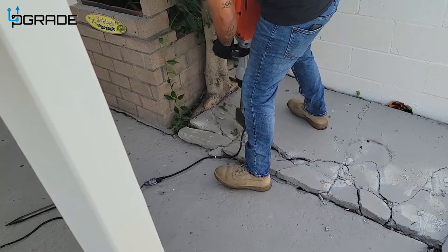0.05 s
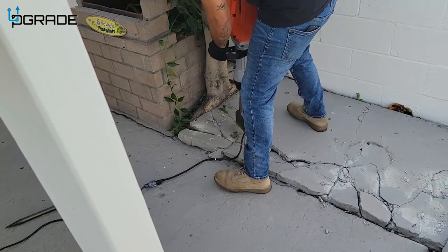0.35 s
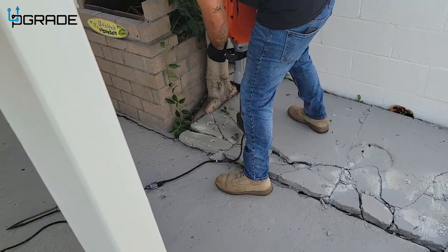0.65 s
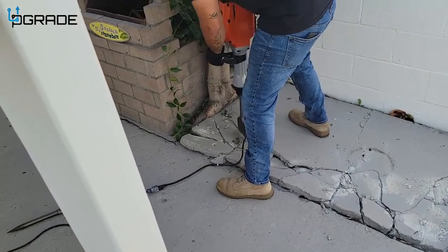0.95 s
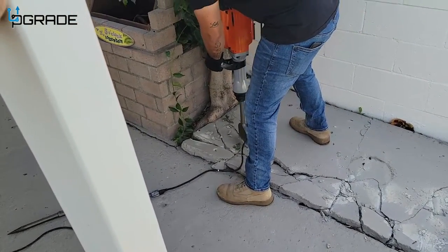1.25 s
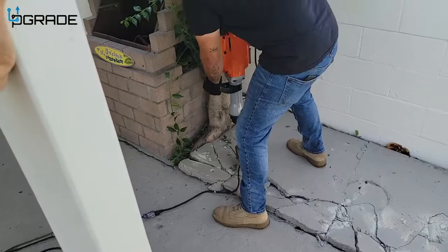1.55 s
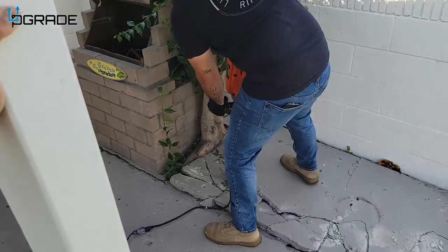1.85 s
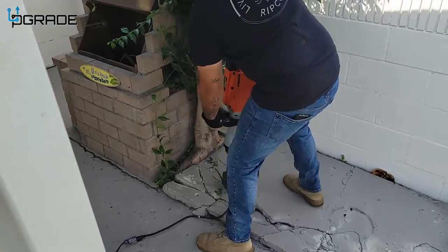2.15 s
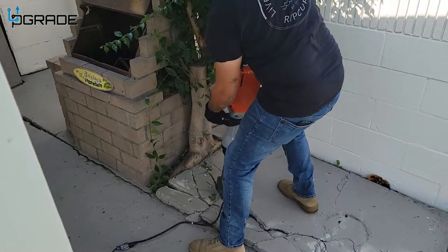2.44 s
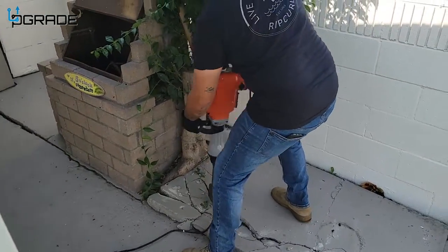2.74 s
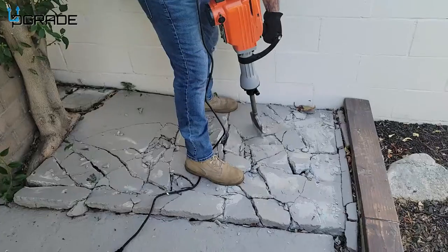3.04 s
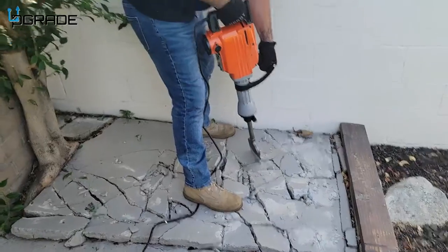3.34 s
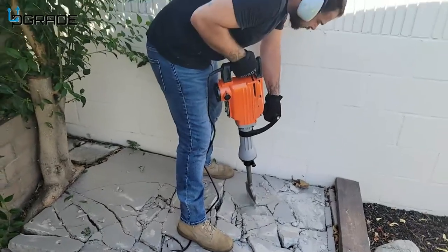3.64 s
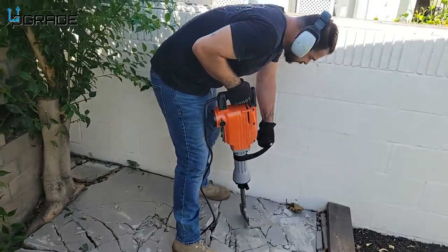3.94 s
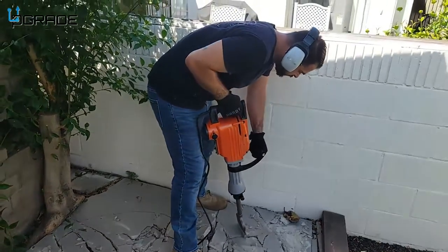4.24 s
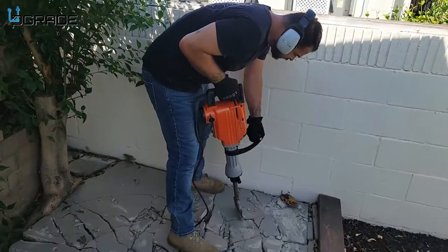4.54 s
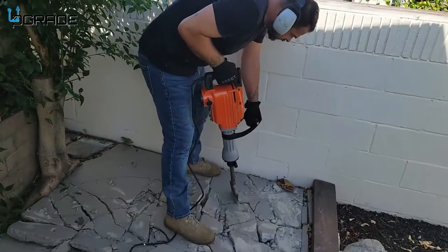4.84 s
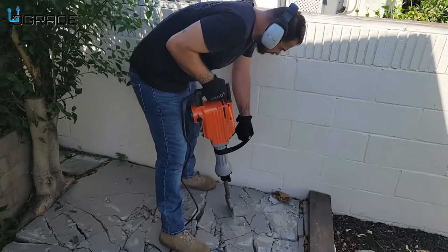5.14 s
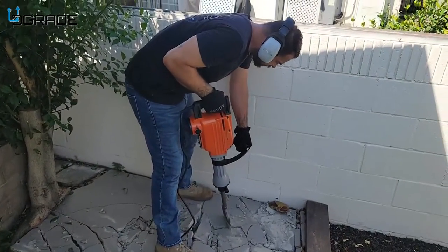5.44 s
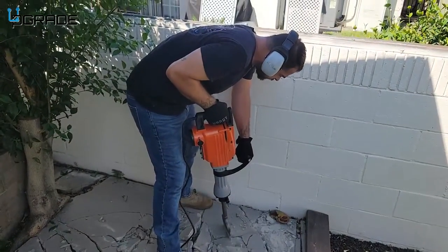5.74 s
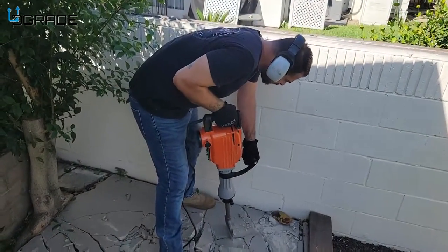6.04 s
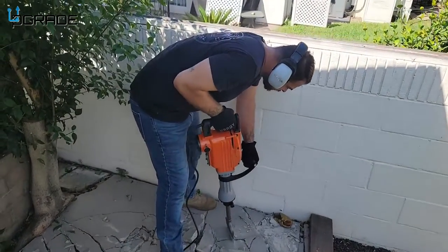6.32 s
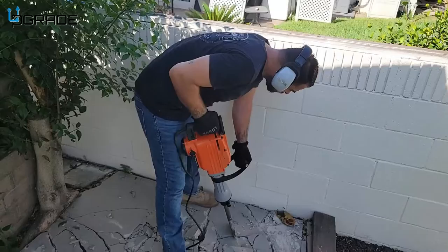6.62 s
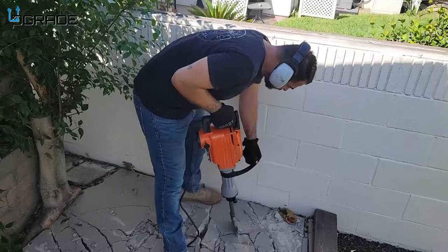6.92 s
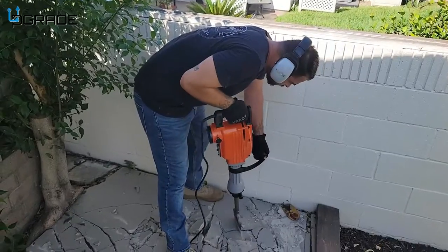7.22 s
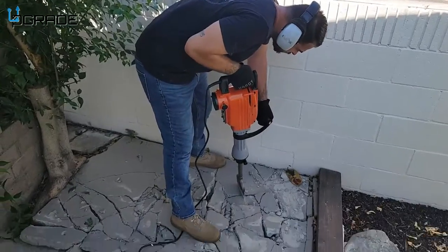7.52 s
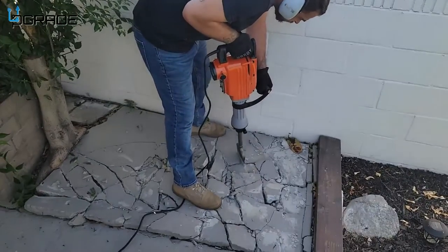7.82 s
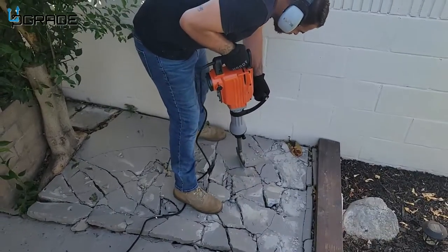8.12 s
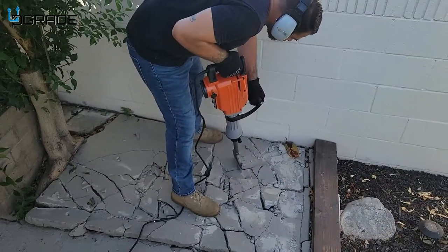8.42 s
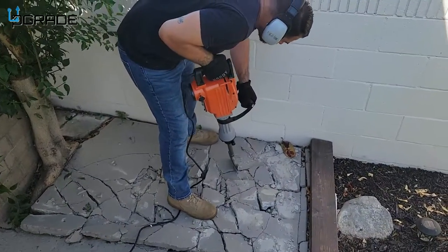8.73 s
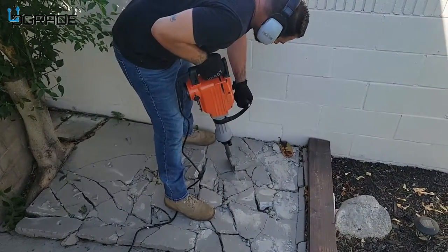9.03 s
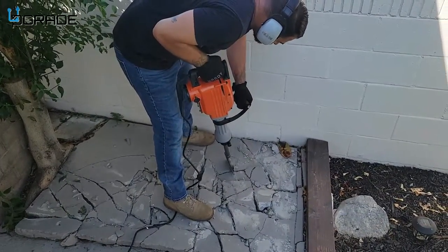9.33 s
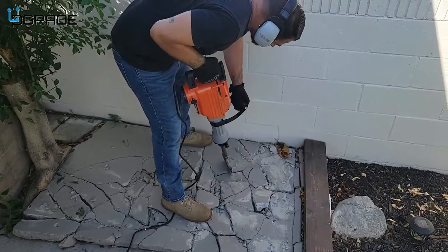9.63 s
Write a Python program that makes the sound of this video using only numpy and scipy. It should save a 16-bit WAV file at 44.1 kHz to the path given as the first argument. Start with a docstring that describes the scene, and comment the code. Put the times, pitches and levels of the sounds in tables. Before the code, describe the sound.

An electric demolition hammer pounds a concrete slab from the start, about 23 hard blows a second, with ringing steel, gritty clatter, low piston thuds and a rushing, whining motor. At about 1.6 seconds it is switched off: the motor fades and the blows slow, dull and weaken, ending near 2.5 seconds. A few faint scrapes of grit follow over a low, distant outdoor rumble. Just before 3 seconds everything cuts to an instant of silence. The hammer comes straight back at full speed, nearer and louder, with heavier thuds. Its chisel bounces slightly unevenly, then settles by about 4.5 seconds. Between 5 and 6 seconds the hollow boom of the casing gives way to more of a drone. The pounding continues steadily, its metallic ring shifting a little, until the end at about 9.8 seconds. The yard's walls add a short reverberation.

```python
"""Hard, ringing blows, 23 a second: an electric demolition hammer breaks a concrete slab in a walled yard. It
works in a corner, is switched off and runs down; then the scene changes abruptly, and it pounds nearer, by a
wall. Each impact excites the damped modes of slab, tool and steel chisel, with a clatter of tiny contacts. The
reversing piston thuds between blows, the motor fan rushes, and the walls return a short reverberation."""
import sys
import numpy as np
from scipy import signal
from scipy.fft import rfft, irfft
from scipy.io import wavfile

SR = 44100
rng = np.random.default_rng(int(sys.argv[2]) if len(sys.argv) > 2 else 0)


def waveform_to_disk(signal):
    """Save audio, clipped to [-1, 1], as 16-bit WAV at the path in sys.argv[1]."""
    frames = np.transpose(np.atleast_2d(signal))
    scaled = np.clip(frames, -1, 1) * 32767
    samples = np.round(scaled).astype(np.int16)
    wavfile.write(sys.argv[1], SR, samples)


N = 435266
TIME = np.arange(N) / SR
BLOW_HZ = 23  # nominal rate, used to normalise levels
CORNER_END_S, WALL_START_S = 2.95, 3.017
PISTON_TURN = .36  # share of a stroke from the blow to the piston's reversal
# the coasting motor loses its fan noise, and its blows stop ringing the chisel
COAST_S, FAN_FALL_DB_PER_S, RING_FALL_DB_PER_S = 1.83, 33, 50
# leaning on the tool damps the boom of the casing and sets the housing droning
LEAN_S, LEAN_TAKES_S, LEAN_BOOM_DB, LEAN_DRONE_DB = 5.17, 0.71, -18.5, 21


def amp(db):
    """Amplitude ratio of a level in decibels."""
    return 10 ** (np.asarray(db) / 20)


def curve(rows, at):
    """Linear interpolation of a table's columns at the given times."""
    s, *columns = np.transpose(rows)
    return [np.interp(at, s, c) for c in columns]


def ramp(at, start_s, takes_s):
    """Linear transition from 0 to 1."""
    return np.clip((at - start_s) / takes_s, 0, 1)


def coasted(at):
    """Seconds for which the motor has been coasting; 0 under power."""
    return np.maximum(at - COAST_S, 0) * (at < CORNER_END_S)


def scatter(times, spread):
    """Independent Gaussian deviations, one a blow."""
    return spread * rng.standard_normal(len(times))


def drift(times, spread, memory=0.85):
    """Correlated deviations: each carries over in part to the next blow."""
    return signal.lfilter([np.sqrt(1 - memory ** 2)], [1, -memory], scatter(times, spread))


def filtered(x, order, hz, kind="low"):
    """Causal, maximally flat filter."""
    return signal.sosfilt(signal.butter(order, hz, kind, fs=SR, output="sos"), x)


def convolve(x, taps):
    """Output of a linear system: x convolved with the impulse response."""
    x, taps = (np.atleast_2d(a).astype(np.float32) for a in (x, taps))
    return signal.oaconvolve(x, taps, axes=-1)[:, :N]


def response(points, size=8192):
    """Minimum-phase impulse response of a spectrum (frequency [Hz], level [dB])."""
    hz, db = np.transpose(points)
    spectrum_db = np.interp(np.log(np.fft.rfftfreq(size, 1 / SR) + 1), np.log(hz), db)
    cepstrum = irfft(np.log(amp(spectrum_db)))
    cepstrum[1:size // 2] *= 2
    cepstrum[size // 2 + 1:] = 0
    return irfft(np.exp(rfft(cepstrum)))[:size // 2]


def decay(t, t60):
    """Exponential damping by 60 dB in t60 seconds."""
    return np.exp(-np.log(1000) * t / t60)


def modes(table, rise_s, size):
    """Modal superposition: a sum of damped sines with a finite rise time."""
    t = TIME[:size]
    ring = sum(amp(db) * np.sin(2 * np.pi * hz * t) * decay(t, t60) for hz, t60, db in table)
    return ring * (1 - np.exp(-t / rise_s))


def per_stroke(ring):
    """Energy normalisation: one such response a stroke gives an rms of 1."""
    return ring * np.sqrt(SR / BLOW_HZ / np.sum(ring ** 2))


def pulses(times, db):
    """Impulse train with the given times and levels."""
    return np.bincount(np.clip(times * SR, 0, N).astype(int), amp(db) * np.ones(len(times)), N + 1)[:N]


def place(times, sounds):
    """Superposition of one sound (a row) at each time."""
    out = np.zeros(N + sounds.shape[1])
    for start, sound in zip(np.clip(times * SR, 0, N).astype(int), sounds):
        out[start:start + len(sound)] += sound
    return out[:N]


# side signal relative to mid: (frequency [Hz], level [dB])
SIDE_SPECTRUM = [(60, -5.5), (150, -2.5), (260, 2), (600, 1.5), (2000, -3), (5000, -.5), (15000, 2.5)]


def stereo(pair):
    """Partial coherence: independent mid and side signals leave the ears most alike in the deep bass."""
    side = convolve(pair[1], response(SIDE_SPECTRUM, size=2048))[0]
    return np.array([pair[0] + side, pair[0] - side]) / np.sqrt(2)


def noise(points):
    """Stationary stereo noise shaped by a spectrum."""
    return stereo(convolve(rng.standard_normal((2, N)), response(points)))


# distant outdoor rumble: (frequency [Hz], level [dB])
RUMBLE_SPECTRUM = [(25, -43), (55, -23), (86, -22), (130, -28.5), (250, -42), (700, -40.5), (2600, -52),
                   (6000, -71), (15000, -73)]


def outdoors():
    """Ambient noise: a steady, distant rumble."""
    return noise(RUMBLE_SPECTRUM)


def yard(x, db, t60=0.28, build_s=0.018, band_hz=(220, 6500), size=26000):
    """Reverberation: block walls and paving add a short diffuse tail, duller than the tool."""
    t = TIME[:size]
    tail = rng.standard_normal((2, size)) * decay(t, t60) * ramp(t, 0, build_s) ** 2
    tail /= np.sqrt(np.sum(tail ** 2) / 2)
    return x + amp(db) * convolve(x, filtered(tail, 1, band_hz, "band"))


# rasps of grit: (time [s], half-width [s], level [dB], centre frequency [Hz])
GRIT_RASPS = [(2.645, 0.0097, -57, 3430), (2.698, 0.014, -51, 1500), (2.802, 0.023, -55, 6000),
              (2.834, .008, -54, 1500), (2.897, .008, -58, 900)]


def scrapes(size=8192):
    """Friction noise: grit rasps as the resting tool is shifted."""
    t, rasps = TIME[:size] - TIME[size // 2], []
    for _, width, db, hz in GRIT_RASPS:
        grit = filtered(rng.standard_normal((2, size)), 1, [hz / 2, hz * 2], "band")
        rasps.append(amp(db) * np.exp(-(t / width) ** 2) * grit / grit.std())
    starts = np.array(GRIT_RASPS)[:, 0] + t[0]
    return np.array([place(starts, np.array(rasps)[:, c]) for c in (0, 1)])


def orders(times, table):
    """Rotational harmonics: tones phase-locked to the crank."""
    running = (TIME > times[0]) & (TIME < times[-1])
    turns = np.interp(TIME, times, np.arange(len(times))) - PISTON_TURN
    return running * sum(amp(db) * np.sqrt(2) * np.sin(-2 * np.pi * order * turns) for order, db in table)


# housing drone: (order [cycles per stroke], level [dB])
DRONE_ORDERS = [(7, -37.5), (9, -42.5), (13, -44.5), (15, -45.5), (17, -41.5), (18, -41.5), (22, -47.5),
                (25, -46.5), (26, -50.5), (28, -49.5), (30, -49.5)]
# gear and commutator whine: (order [cycles per stroke], level [dB])
WHINE_ORDERS = [(92, -68.5), (288, -44.5)]


def motor(times, spot, flutter_db=2.0, drone_db=-21):
    """Machine noise: fan air, modulated by each stroke's load, with drone and whine; all fade on coasting."""
    turns = np.interp(TIME, times, np.arange(len(times)))
    fan = noise(spot["fan"]) * amp(flutter_db * np.sin(2 * np.pi * turns))
    drone = orders(times, DRONE_ORDERS) * amp(drone_db + LEAN_DRONE_DB * ramp(TIME, LEAN_S, LEAN_TAKES_S))
    whine = orders(times, WHINE_ORDERS)
    return (fan + drone + whine) * amp(spot["motor_db"] - FAN_FALL_DB_PER_S * coasted(TIME))


# swells of deep bass in the piston's thuds: (time [s], half-width [s], level relative to the thuds [dB])
BASS_SWELLS = [(1.552, .25, 2), (5.8, 0.24, -18), (8.35, 0.3, -4)]


def swell_bass(thuds, deep_hz=78):
    """Amplitude modulation: the thuds' deep bass swells, first as the unloaded tool shakes at switch-off."""
    swells = sum(amp(db) * np.exp(-((TIME - s) / width) ** 2) for s, width, db in BASS_SWELLS)
    bass = signal.sosfiltfilt(signal.butter(2, deep_hz, fs=SR, output="sos"), thuds)
    return thuds + swells * bass


def piston(times, db, spot, trim_db=-1.0, hollow_hz=(135, 195)):
    """Inertial reaction: the piston reverses between blows and shakes the whole tool."""
    gaps = np.minimum(np.diff(times, append=2 * times[-1] - times[-2]), .06)
    thud = per_stroke(response(spot["piston"], size=4096))
    # all-pass: the hollow housing delays the upper bass, drawing the thuds out into a drone
    thud = thud - 2 * filtered(thud, 1, hollow_hz, "band")
    return convolve(pulses(times + PISTON_TURN * gaps, db + trim_db + scatter(times, 0.099)), thud)


# barrel resonances: (frequency [Hz], 60 dB decay time [s], level [dB])
BARREL_MODES = [(2565, .5, 1), (2597, .6, -2), (2690, 0.51, -6), (3360, .45, 2), (3900, 0.63, -10),
                (4630, 0.51, -5)]


def barrel(times, force_db, bell_db=-45.5, follow=0.28, jitter_s=.0003):
    """Light damping: the metal barrel sustains a faint chord, set off even by weak blows."""
    bell = per_stroke(modes(BARREL_MODES, rise_s=.002, size=32768))
    return convolve(pulses(times + scatter(times, jitter_s), follow * force_db + bell_db), bell)


# casing resonances: (frequency [Hz], 60 dB decay time [s], level [dB])
CASING_MODES = [(267.4, 0.059, 6), (316.5, 0.081, -1.5)]


def casing(times, db, trim_db=-4):
    """Resonance of a hollow body: the tool booms under each blow."""
    boom = per_stroke(modes(CASING_MODES, rise_s=0.0022, size=2048))
    return convolve(pulses(times, db + trim_db + scatter(times, 0.53)), boom)


# tool holder resonances: (frequency [Hz], level [dB])
HOLDER_MODES = [(1720, 1), (2070, 2.5), (2680, 5.5), (3050, 2), (3380, 3), (3800, -17), (4550, 3),
                (5350, 2)]


def clank(times, db, t60=0.11, spread_db=4.5, wander=0.0249, rise_s=0.0018, size=2400):
    """Variable contact: each blow catches the loose holder differently, so its modes vary in pitch and level."""
    t, shape = TIME[:size], (len(times), len(HOLDER_MODES), 1)
    hz, mode_db = np.transpose(HOLDER_MODES)[..., None]
    phase = 2 * np.pi * hz * (1 + wander * rng.standard_normal(shape)) * t
    envelope = per_stroke((1 - np.exp(-t / rise_s)) * decay(t, t60))
    hit = amp(db[:, None, None] + mode_db + spread_db * rng.standard_normal(shape)) / np.sqrt(len(hz))
    sides = [np.sum(hit * np.sin(phase + 2 * np.pi * rng.random(shape)), axis=1) for _ in (0, 1)]
    return np.array([place(times, side * envelope) for side in sides])


# chisel resonances: (frequency [Hz])
CHISEL_FREQUENCIES = [4161, 4936, 6422, 6878, 7930, 9092, 10271, 11020, 12726, 13770, 13950]
# for each of them: (60 dB decay time [s], level [dB], group [0 low, 1 main, 2 high])
CHISEL_MODES = [(0.063, 3.5, 0), (0.097, -4.5, 0), (0.11, -10.5, 1), (0.084, 1, 1), (.09, -12, 1),
                (0.12, -16, 2), (0.1, -11.5, 2), (0.06, -17.5, 2), (0.1, -2.5, 2), (0.081, -11.5, 2),
                (0.11, -10, 2)]
# ring of each group as the chisel shifts in its seat: (time [s], low [dB], main [dB], high [dB])
CORNER_RING_LEVELS = [(0, -35, -40.5, -29), (.45, -37.5, -27.5, -29), (.95, -41, -36, -34.5),
                      (1.2, -37, -32, -29.5), (1.8, -44, -28.5, -33)]
WALL_RING_LEVELS = [(3.05, -38, -29.5, -25), (3.8, -38, -31.5, -25), (4.65, -34, -27, -25.5),
                    (5.45, -37, -31.5, -23), (6.35, -31.5, -25.5, -26.5), (6.72, -27.5, -31.5, -30),
                    (7.05, -37.5, -21.5, -24.5), (7.6, -30.5, -33.5, -27.5), (8.2, -42, -27.5, -25),
                    (8.6, -43, -26, -28), (9.8, -34, -25.5, -27.5)]


def chisel(times, group_db, spot, trim_db=0.5, rise_s=0.0069, uneven_db=3.5, split=0.0025, size=5000):
    """Free vibration of a steel bar: each blow rings its modes anew, each split into a close pair."""
    t = TIME[:size]
    hz, t60, db, group = np.repeat(np.column_stack([CHISEL_FREQUENCIES, CHISEL_MODES]), 2, axis=0).T
    hz = hz * spot["stiffness"] * (1 + split * (-1) ** np.arange(len(hz)))
    rings = np.exp(np.outer(2j * np.pi * hz - np.log(1000) / t60, t)) * (1 - np.exp(-t / rise_s))
    rings *= np.sqrt(SR / BLOW_HZ / np.sum(abs(rings) ** 2, axis=1))[:, None]
    shape = (len(times), len(hz))
    hit = amp(group_db[group.astype(int)].T + db + trim_db) * np.exp(2j * np.pi * rng.random(shape))
    # reflections shift strength and phase at each side
    sides = [hit * amp(uneven_db * rng.standard_normal(shape)) * np.exp(1j * rng.standard_normal(shape))
             for _ in (0, 1)]
    return np.array([place(times, (side @ rings).imag) for side in sides])


# the slab's two modes, shifting as it cracks: (time [s], lower frequency [Hz], upper frequency [Hz])
CORNER_SLAB_MODES = [(0, 850, 1260), (1.0, 850, 1200), (1.6, 980, 1120)]
WALL_SLAB_MODES = [(3.05, 797, 1080), (4.3, 910, 1240), (4.9, 910, 1235), (5.15, 870, 1320),
                   (5.6, 806, 1080), (6.2, 830, 1240), (7.95, 850, 1236), (8.25, 890, 1410),
                   (8.6, 890, 1175), (9.8, 900, 1210)]


def knock(times, db, slab, spot, t60s=(0.023, 0.026), upper_db=-5, wander=0.0046, size=2000):
    """Heavy damping: two dead slab modes, with early reflections from the ground and nearby walls."""
    t = TIME[:size]
    pitches = [hz * (1 + scatter(times, wander)) for hz in curve(slab, times)]
    lower, upper = (np.sin(2 * np.pi * hz[:, None] * t) * decay(t, t60) for hz, t60 in zip(pitches, t60s))
    # the slab radiates little below its modes
    blows = filtered(lower + amp(upper_db) * upper, 2, 520, "high")
    blows = amp(db + spot["knock_db"])[:, None] * np.array([per_stroke(b) for b in blows])
    paths = sum(amp(echo_db) * place(times + ms / 1000, blows) for ms, echo_db in spot["echoes"])
    return paths / np.sqrt(sum(amp(echo_db) ** 2 for _, echo_db in spot["echoes"]))


def clatter(times, db, spot, likeness=0.89, rise_s=0.0013, grit_db=2, size=3000):
    """Impact noise: striker, holder and crumbling concrete make a burst of contacts, much like the last."""
    t = TIME[:size]
    fresh = rng.standard_normal((len(times), 2, size))
    initial = likeness * rng.standard_normal((1, 2, size))
    bursts, _ = signal.lfilter([np.sqrt(1 - likeness ** 2)], [1, -likeness], fresh, axis=0, zi=initial)
    grit = amp(grit_db * np.repeat(rng.standard_normal((len(times), size // 20)), 20, axis=1))
    envelope = amp(db)[:, None] * grit * (1 - np.exp(-t / rise_s)) * np.exp(-t / spot["fade_s"])
    contacts = [place(times, bursts[:, c] * envelope) for c in (0, 1)]
    return stereo(convolve(contacts, response(spot["clatter"])))


def soften(x, dull_hz=5000, fall_db_per_s=14):
    """Contact time limits bandwidth: slower impacts lose their treble as the motor coasts."""
    low = filtered(x, 1, dull_hz)
    return low + (x - low) * amp(-fall_db_per_s * coasted(TIME))


# slowing blows after switch-off: (time [s], force [dB])
COASTING_BLOWS = [(1.595, -2.5), (1.641, -1.5), (1.691, -2), (1.748, -3), (1.811, -4), (1.878, 0.5),
                  (1.957, 0), (2.051, -1.5), (2.175, -3.5), (2.357, -10.5), (2.465, -13)]


def run_down(ring_db=-2.0, rebound_s=0.014, rebound_db=-2, free_gap_s=.1):
    """Inertia drives the last blows, which rebound if there is time: (time [s], force [dB], ring [dB])."""
    times, force_db = np.transpose(COASTING_BLOWS)
    blows = np.transpose([times, force_db, ring_db - RING_FALL_DB_PER_S * coasted(times)])
    rebounds = blows[:-1][np.diff(times) > free_gap_s] + [rebound_s, rebound_db, rebound_db]
    blows = np.vstack([blows, rebounds])
    return blows[np.argsort(blows[:, 0])]


# motor pace under load: (time [s], stroke landing then [count])
CORNER_STROKES = [(.0323, 0), (1.5518, 35)]
WALL_STROKES = [(3.0015, 0), (3.5829, 13), (4.2043, 27), (5.2625, 51), (5.6126, 59), (6.572, 81),
                (7.3612, 99), (7.9708, 113), (8.6639, 129), (9.8362, 156)]
DIG_IN_S, DIG_IN_TAKES_S, BOUNCE_LEFT = 3.9, .55, .13


def strokes(pace, late_s=.0007, soft_db=0.3, glance_db=0.05, choke_db=1.5, jitter_s=.00007):
    """Nearly periodic excitation by the powered striker: (time [s], force [dB], ring [dB])."""
    s, number = np.transpose(pace)
    count = np.arange(int(number[-1]) + 1)
    times = np.interp(count, number, s)
    # period doubling: by the wall the chisel bounces, every second blow late and weak, until it digs in
    bounce = (1 - (1 - BOUNCE_LEFT) * ramp(times, DIG_IN_S, DIG_IN_TAKES_S)) * (times > CORNER_END_S)
    weak = (-1) ** count * bounce
    landings = times + late_s * weak + scatter(times, jitter_s)
    force_db = -soft_db * weak - glance_db * bounce + scatter(times, 0.21)
    return np.transpose([landings, force_db, -choke_db * weak])


# each spot: piston, clatter and fan spectra (frequency [Hz], level [dB]), echoes (delay [ms], level [dB]),
# clatter time constant [s], stiffness [chisel pitch ratio] and the level of each part [dB]
CORNER_SPOT = dict( piston=[(10, -46), (23, -47), (46, 0), (69, 2.5), (92, 5), (115, -5.5), (160, -4.5),
               (200, -14.5), (260, -3), (500, -54), (3000, -86)], clatter=[(120, -48), (300, -10),
               (600, -6.5), (1100, -4), (1900, -7.5), (2400, -10.5), (3000, -10.5), (4400, -10),
               (5700, -11.5), (6700, -8), (8800, -20), (12000, -16), (15500, -25)], fan=[(60, -19.5),
               (300, -22.5), (900, -24), (1300, -27), (1700, -26.5), (3400, -20.5), (5600, -29.5),
               (6600, -23), (9000, -31), (15500, -29.5)], echoes=[(0, -11), (3.9, 10), (6.3, 7)],
               fade_s=0.0096, stiffness=1.003, yard_db=-9.5, knock_db=-39.5, piston_db=-34, casing_db=-25.5, motor_db=1.5, clank_db=-33.5)
WALL_SPOT = dict( piston=[(10, -63), (23, -64), (46, -3), (69, -2), (92, 4.5), (115, -2), (138, 0),
             (161, 2), (184, -14), (207, 2.5), (245, -24.5), (390, -18), (600, -34), (3000, -57)],
             clatter=[(120, -28), (470, -13.5), (620, -0.5), (1000, 0), (1400, -1.5), (1750, -2.5),
             (2200, -6), (3200, -3.5), (4500, -7.5), (6000, -7.5), (8500, -14.5), (11500, -10.5),
             (15500, -21)], fan=[(60, -16.5), (300, -22.5), (480, -20.5), (900, -29), (1400, -26.5),
             (2500, -22), (3500, -21.5), (6000, -26.5), (9000, -30), (15500, -30.5)], echoes=[(0, -24),
             (2.2, 31), (4.52, -1), (8.4, -12)],
             fade_s=0.0071, stiffness=1.0001, yard_db=-12, knock_db=-28, piston_db=-25.5, casing_db=-27, motor_db=3, clank_db=-31.5)
# after switch-off the tool is held more loosely and the casing booms less
EASE_S, EASE_TAKES_S, EASE_BOOM_DB = 1.52, 0.35, -6


def hammer(blows, slab, ring, spot, seat_db=2.2, knock_drift_db=-0.65):
    """Superposition of the tool's sources at one spot; the force wanders as the chisel shifts in its seat."""
    times, force_db, ring_db = np.transpose(blows)
    lean = ramp(times, LEAN_S, LEAN_TAKES_S)
    ease = ramp(times, EASE_S, EASE_TAKES_S) * (times < CORNER_END_S)
    direct = (clatter(times, force_db + drift(times, seat_db), spot)
              + knock(times, force_db + drift(times, knock_drift_db), slab, spot)
              + chisel(times, np.array(curve(ring, times)) + ring_db, spot)
              + clank(times, force_db + spot["clank_db"])
              + casing(times, force_db + spot["casing_db"] + LEAN_BOOM_DB * lean + EASE_BOOM_DB * ease)
              + barrel(times, force_db)
              + motor(times, spot))
    thuds = piston(times, force_db + spot["piston_db"], spot)
    return yard(soften(direct), spot["yard_db"]) + swell_bass(thuds)


def scene():
    """Two sound fields in turn, parted by a moment of silence: the corner, then the spot by the wall."""
    corner_blows = np.vstack([strokes(CORNER_STROKES), run_down()])
    corner = hammer(corner_blows, CORNER_SLAB_MODES, CORNER_RING_LEVELS, CORNER_SPOT) + scrapes()
    wall = hammer(strokes(WALL_STROKES), WALL_SLAB_MODES, WALL_RING_LEVELS, WALL_SPOT)
    air = outdoors()
    corner_gate = np.clip((CORNER_END_S - TIME) / 0.0035, 0, 1)
    wall_gate = ramp(TIME, WALL_START_S, 0.0034)
    return (corner + air) * corner_gate + (wall + air) * wall_gate


def record(dry, ceiling=1.14, low_cut_hz=36, top_hz=15950):
    """Band limiting and saturation: the microphone drops deep bass, rounds the peaks and cuts the top."""
    rounded = ceiling * np.tanh(filtered(dry, 2, low_cut_hz, "high") / ceiling)
    return signal.sosfilt(signal.ellip(10, .1, 80, top_hz, fs=SR, output="sos"), rounded)


dry = scene()
out = record(dry)
waveform_to_disk(out)
```